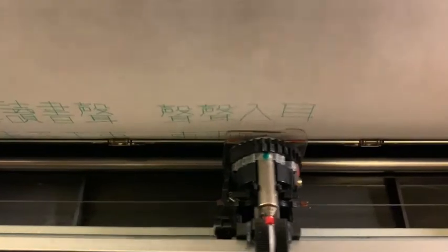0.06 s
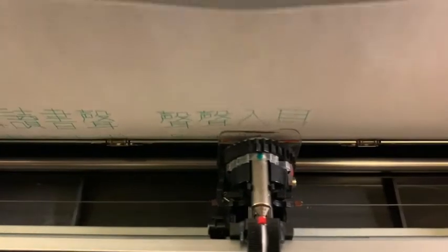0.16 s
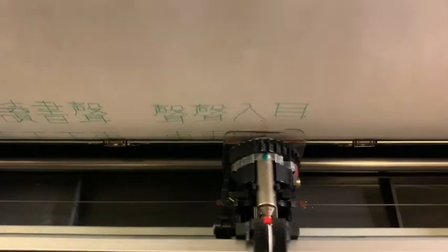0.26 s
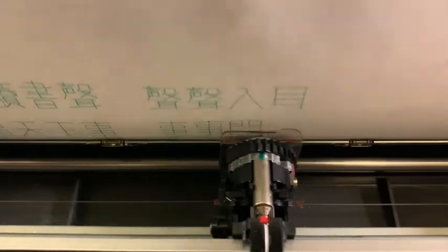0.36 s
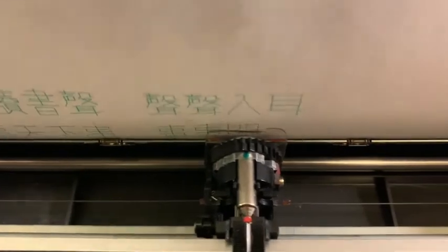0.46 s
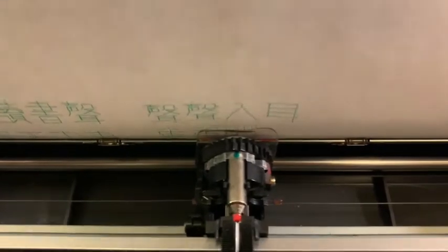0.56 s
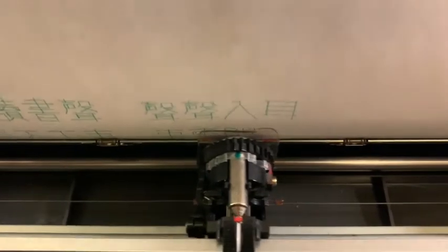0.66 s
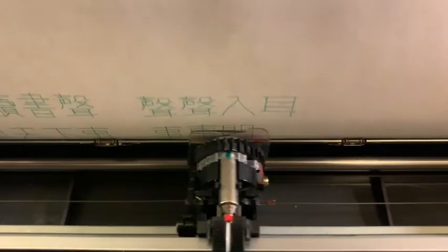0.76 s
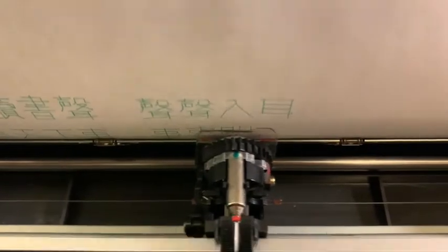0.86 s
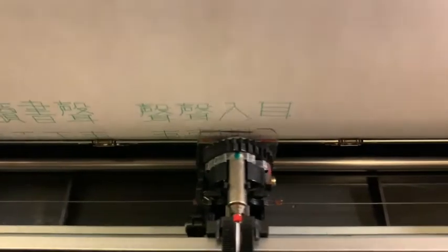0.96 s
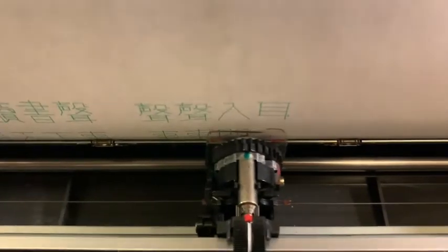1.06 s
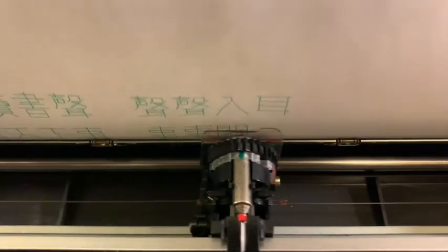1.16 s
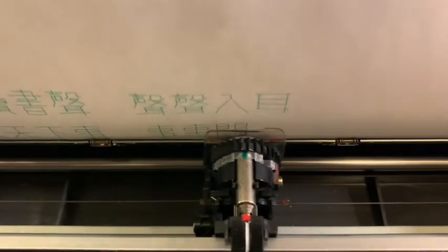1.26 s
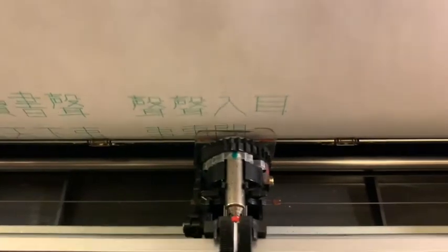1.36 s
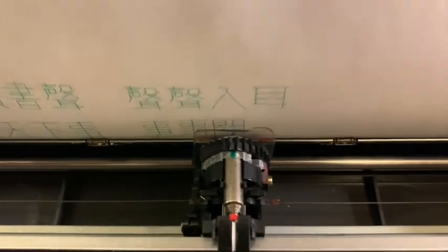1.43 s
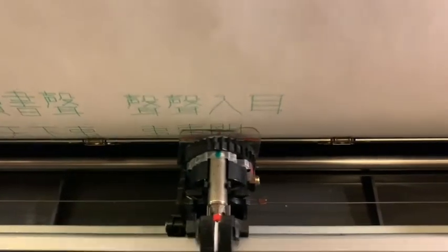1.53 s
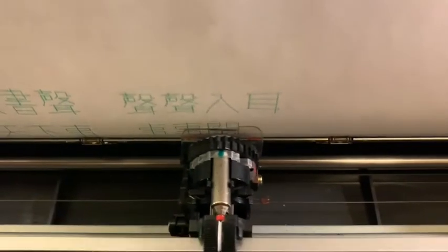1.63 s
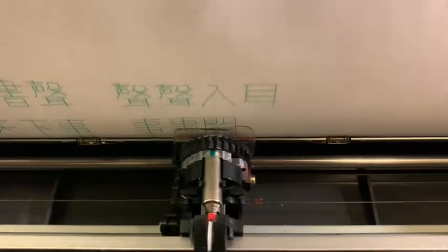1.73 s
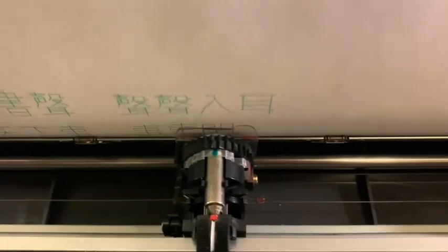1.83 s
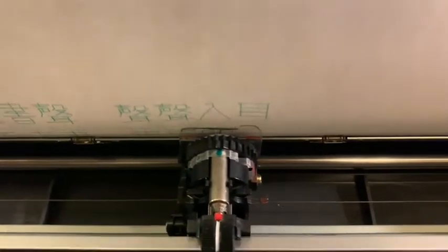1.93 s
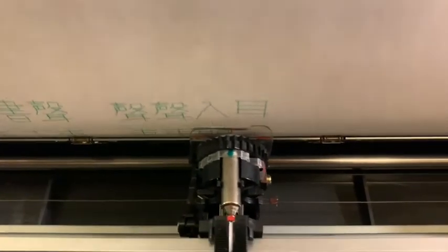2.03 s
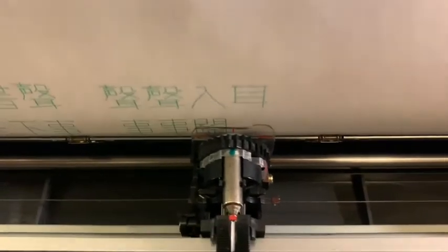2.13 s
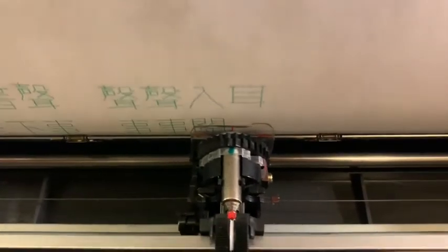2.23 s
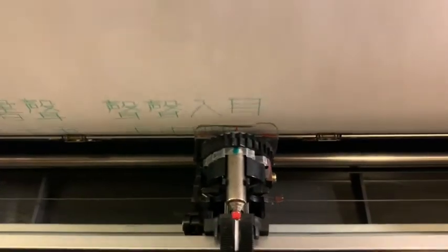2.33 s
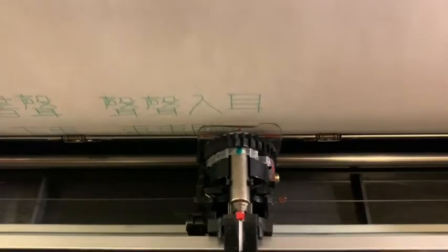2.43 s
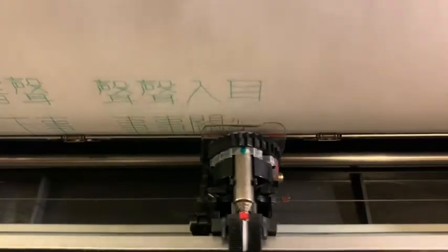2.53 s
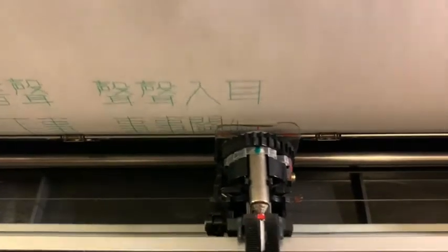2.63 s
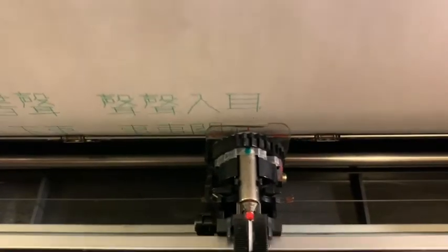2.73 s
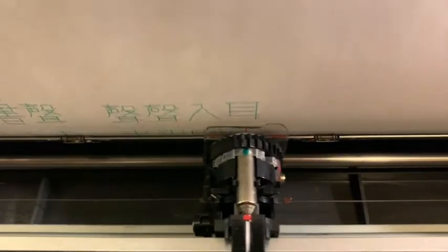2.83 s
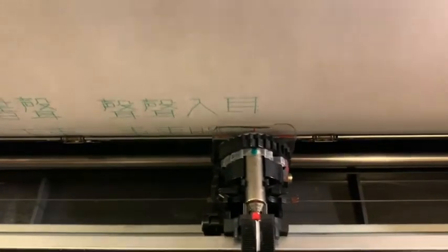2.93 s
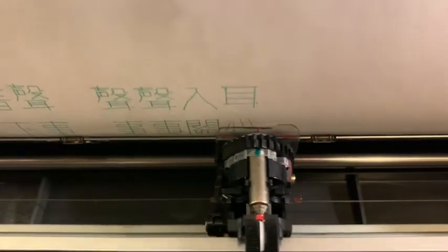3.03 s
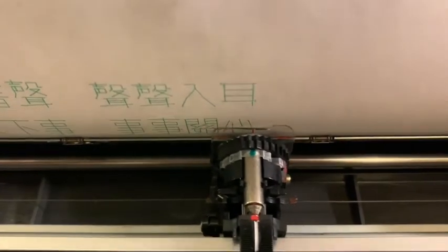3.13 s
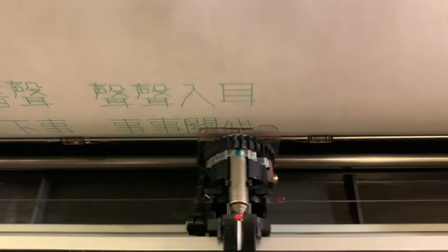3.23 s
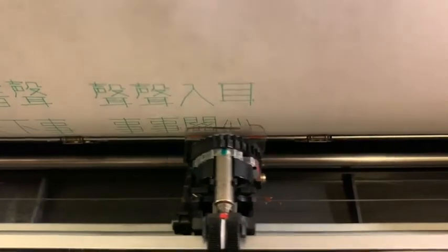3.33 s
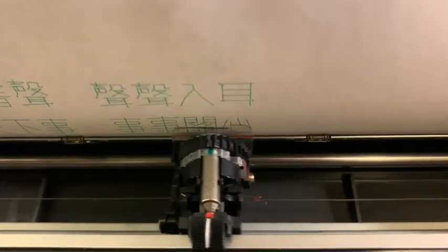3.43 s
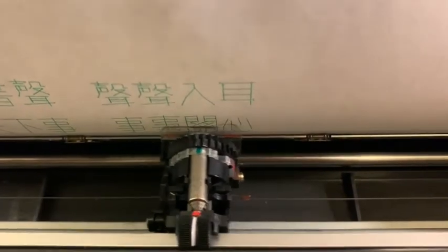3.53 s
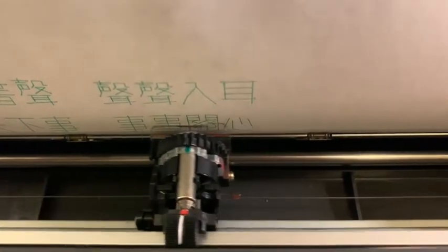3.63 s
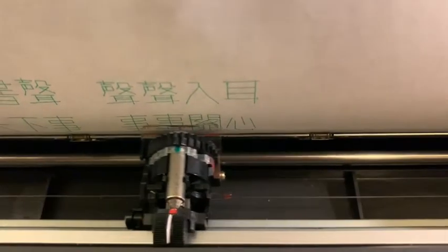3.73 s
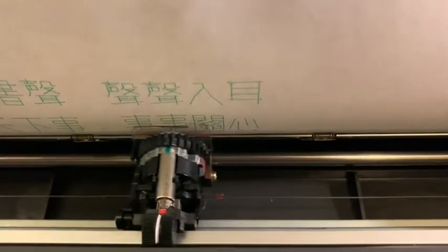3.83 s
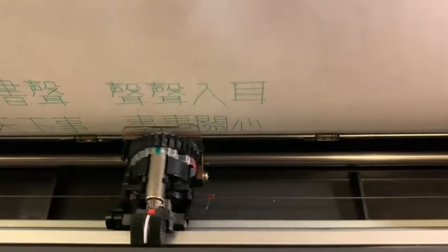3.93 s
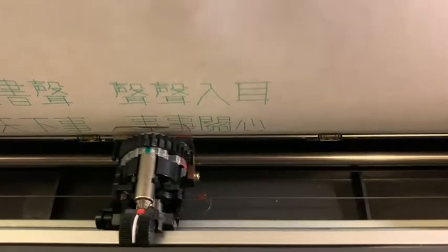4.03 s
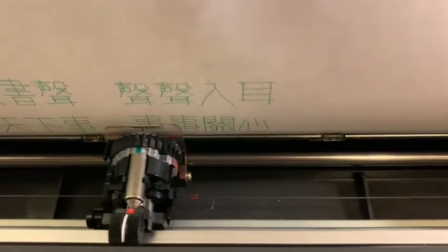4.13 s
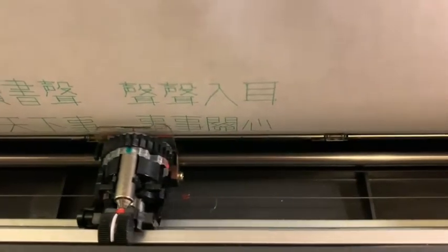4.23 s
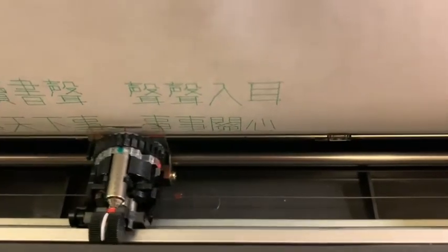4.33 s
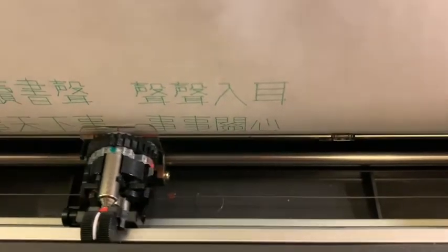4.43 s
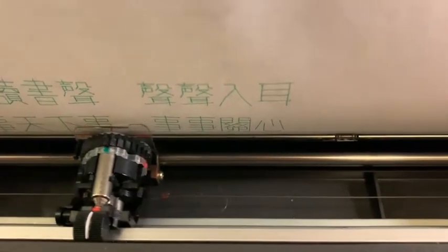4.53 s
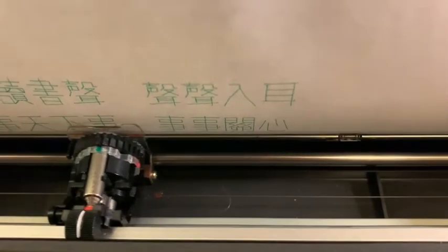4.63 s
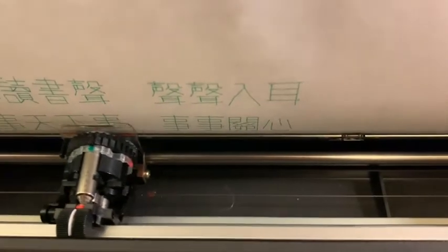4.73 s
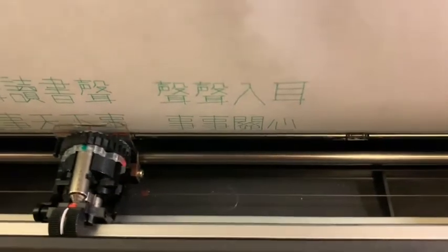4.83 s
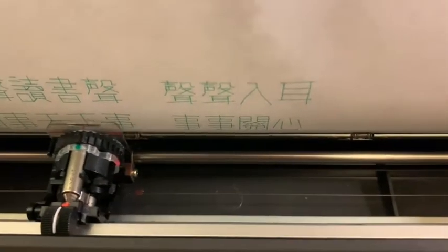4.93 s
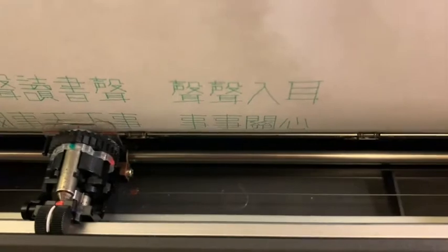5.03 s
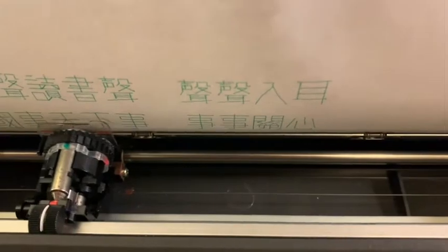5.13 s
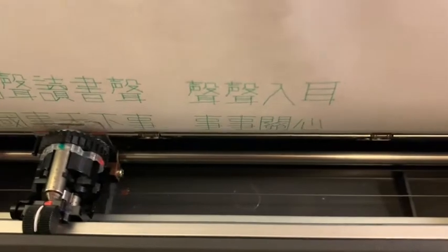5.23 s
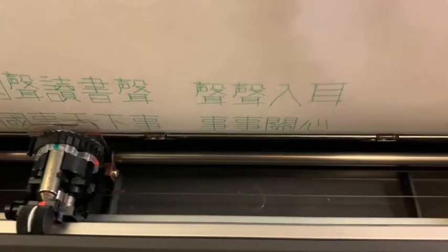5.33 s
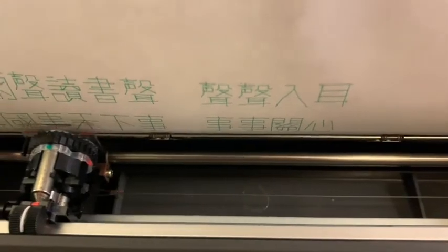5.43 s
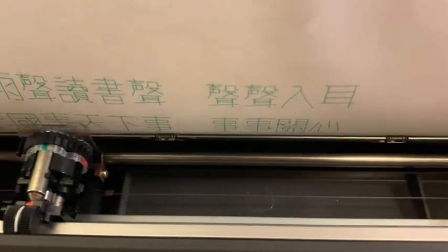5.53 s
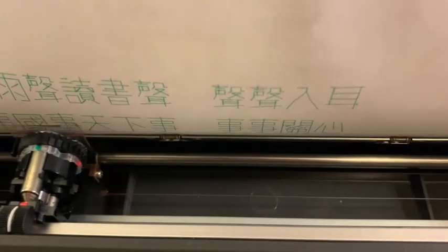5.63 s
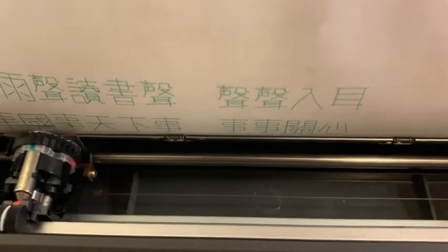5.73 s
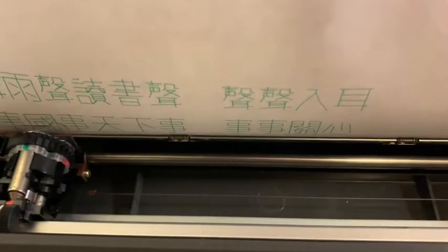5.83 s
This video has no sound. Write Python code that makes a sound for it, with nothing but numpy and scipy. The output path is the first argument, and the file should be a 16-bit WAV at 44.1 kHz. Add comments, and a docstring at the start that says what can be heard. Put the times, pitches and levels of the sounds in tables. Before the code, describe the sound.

A pen plotter is heard from close by in a small, fairly dead room. From 0 to 3.1 s it writes in short jerks: low, wavering motor hums around 120 to 175 Hz last a tenth or two of a second, each at a slightly different pitch, with rattling frame, loose buzzing parts and dull knocks at starts and stops. From about 0.4 s, fourteen very bright, sharp pen snaps with tiny rebounds and a brief metallic ring stand far above the motors, a few per second. Fine nib scratching accompanies strokes. Short higher roller buzzes cluster around 0.6, 1.0, 1.75 and 2.55 s. At 3.1 s the writing stops and a much quieter, steady run begins: nearly sixty crisp ticks per second, almost a purr, with soft sliding, irregular small clacks and a thin wire ring drifting mostly downward. It continues until the end, near 5.9 s, over faint casing rumble.

```python
"""A small room, listened to from close by: a pen-plotter typewriter writes characters.
The pen lever snaps up and down as enveloped noise through resonances, with decaying pure rings on top.
Stepper motors jerk the carriage and paper roller in short strokes: wavering partials and rattling noise.
Then the carriage ticks steadily back to the left margin, each step a set of small noise bursts and rings.
Behind it the casing rumbles and the walls return a short, dull tail."""
import sys
import numpy as np
from scipy import signal
from scipy.fft import rfft, irfft
from scipy.io import wavfile
from scipy.ndimage import uniform_filter1d

SR = 44100
rng = np.random.default_rng(int(sys.argv[2]) if len(sys.argv) > 2 else 0)


def write(x):
    x = np.atleast_2d(x).T
    wavfile.write(sys.argv[1], SR, np.round(np.clip(x, -1, 1) * 32767).astype(np.int16))

N = 258867
TIME = np.arange(N) / SR
FIRST_STEP_S, STEPS_PER_S = 3.1039, 57.935   # the return run

# Pen contacts; clack, clink and spring are relative to the snap and rebounds. Each row: snap time in seconds,
# snap level in dB, first rebound delay in seconds, its dB, second rebound delay in seconds, its dB,
# lead-in noise dB, seat dB, frame clack dB, lever clink dB, spring dB, lever pitch in Hz, spring pitch in Hz,
# pen holder ring dB.
PEN = [(.4262, -10.5, 0.0028, -12.5, 0.0062, -28, -18, -27, -15.5, -14, -19, 13000, 10500, -29),
       (.6614, -8.5, 0.006, -13.5, 0.013, -29, -33, -29, -16.5, -22, -15.5, 12880, 10630, -28),
       (.8741, -11, .002, -11.5, 0.0058, -20, -23, -35, -16, -15, -18.5, 13300, 10800, -29),
       (1.0235, -6, 0.0063, -10.5, .009, -30, -31, -33, -19.5, -21, -16, 12900, 9800, -42),
       (1.2317, -10, 0.0023, -7, 0.0087, -18, -29, -33, -18, -18.5, -17, 13250, 9510, -30),
       (1.353, -8, .0025, -13.5, 0.0057, -13, -23, -38, -15.5, -18.5, -17, 12600, 9400, -33),
       (1.4713, -15, 0.0025, -21, 0.0062, -11.5, -27, -31, -13.5, -16, -14, 13270, 10200, -25),
       (1.6254, -10, .0025, -10, .0057, -11, -28, -38, -17, -17.5, -17, 13250, 9595, -29),
       (1.7653, -12, 0.0041, -15.5, 0.0055, -12.5, -32, -36, -15, -17, -12.5, 13310, 10290, -26),
       (2.0201, -13.5, 0.001485, -15.5, .006, -14, -26, -34, -12, -15, -13, 12400, 10030, -27.5),
       (2.3778, -11, .0024, -10, .005, -20, -30, -40, -16, -13.5, -10, 12600, 9550, -36),
       (2.6452, -9.5, 0.0013, -17, .006, -16.5, -44, -31, -11.5, -18, -11, 13730, 9500, -32),
       (2.84, -16.5, 0.0021, -15, 0.0059, -12.5, -23, -43, -12, -12, -8, 13400, 10620, -27),
       (3.047, -7, 0.0041, -18, 0.0068, -13.5, -35, -45, -19, -17, -11, 13790, 9880, -35)]
# Spectra of contact, clack, clink and spring. Each row: frequency in Hz, relative level in dB.
PEN_COLOUR = [(400, -29), (1500, -17), (3000, -20), (5500, -24), (7000, -18.5), (8700, -9), (10000, -13),
              (11300, -9), (12100, -10.5), (13100, 1), (14000, -1.5), (14800, -3), (15600, -5),
              (16500, -5.5)]
CLACK_COLOUR = [(80, -2), (200, 4), (450, 5), (620, 3.5), (800, 0), (1200, -3), (1900, -16.5), (2700, -4),
                (3700, -13), (4700, -8), (7000, -11), (15000, -11)]
CLINK_COLOUR = [(1000, -10), (2400, 2.5), (3400, -2.5), (4000, -1), (4800, -2), (6000, -1.5), (7800, 5.5),
                (9000, -24), (16000, -55)]
SPRING_COLOUR = [(4000, -36), (7500, -38), (8700, -9.5), (10000, 7), (11200, 0), (12200, -18), (16000, -22)]
# Resonances of the pen lever and the frame. Each row: centre in Hz, width in Hz, lift in dB.
LEVER = [(3382, 69, 13), (4640, 260, 9), (6980, 350, 5.5), (7830, 150, 5), (7960, 220, 4.5), (8650, 190, 6),
         (9900, 220, 5.5), (10320, 130, -7), (10500, 220, 6), (11200, 190, -4), (12670, 350, 7.5),
         (13200, 430, -2), (13800, 260, 2.5), (15100, 360, -8)]
FRAME = [(312, 92, 3.5), (416.6, 22, 7), (484, 54, 10.5), (791, 20, 1.5), (1069, 43, 5), (1440, 106, 10),
         (1605, 350, 10.5), (2124, 31, 6), (2260, 76, 9.5), (2597, 110, 5.5), (3380, 16, 3.5)]
# Stereo width of the writing. Each row: frequency in Hz, side minus mid in dB.
WIDTH_WRITING = [(60, -24), (110, -30), (200, -10), (380, -18.5), (700, -5.5), (1290, -2), (2380, -0.5),
                 (4400, 0.5), (8120, 0), (15000, -25)]
PEN_LEAD_S, PEN_SETTLE_S = 0.0038, 0.0187   # a faint noise swells just before the snap; the lever seats after it
PEN_DECAY_S, CLACK_LAG_S = 0.00069, 0.0031   # each contact dies quickly; the frame answers a little later
LEVER_RING_DB, SPRING_RING_DB = -7, -5   # pure rings, relative to the contact and to the spring's rattle
HOLDER_HZ, HOLDER_LAG_S = 791, 0.00514   # the pen holder rings just after the snap


def pen():
    """A faint noise leads in, the lever snaps, rebounds twice and seats; frame, spring and holder ring."""
    (s, snap_db, first_s, first_db, second_s, second_db, lead_in_db, seat_db,
     clack_db, clink_db, spring_db, lever_hz, spring_hz, holder_db) = np.transpose(PEN)
    hits_s = np.array([s, s + first_s, s + second_s])
    hits_db = np.array([snap_db, first_db, second_db])
    snap = blows(hits_s, hits_db, rise_s=0.00023, decay_s=PEN_DECAY_S)
    lead_in = blows(s - PEN_LEAD_S, lead_in_db, rise_s=0.0012, decay_s=0.0044)
    ringing = blows(hits_s, hits_db - 15, rise_s=0.00064, decay_s=0.002)
    seat = blows(s + PEN_SETTLE_S, seat_db, rise_s=0.0003, decay_s=0.0034)
    contact = np.sqrt(snap ** 2 + lead_in ** 2 + ringing ** 2 + seat ** 2)
    clack = blows(hits_s + CLACK_LAG_S, hits_db + clack_db, rise_s=0.00047, decay_s=0.0097)
    clink = blows(hits_s, hits_db + clink_db, rise_s=0.000063, decay_s=0.0035)
    spring = blows(hits_s, hits_db + spring_db, rise_s=0.00028, decay_s=0.0024)
    return (radiate(contact, PEN_COLOUR, WIDTH_WRITING, LEVER)
            + radiate(clack, CLACK_COLOUR, WIDTH_WRITING, FRAME)
            + radiate(clink, CLINK_COLOUR, WIDTH_WRITING, LEVER)
            + radiate(spring, SPRING_COLOUR, WIDTH_WRITING, LEVER)
            + ring(hits_s, lever_hz, hits_db + LEVER_RING_DB, decay_s=0.0021)
            + ring(hits_s, spring_hz, hits_db + spring_db + SPRING_RING_DB, decay_s=0.0028)
            + ring(s + HOLDER_LAG_S, HOLDER_HZ, holder_db, decay_s=0.015))


# The nib digs into the paper and rasps. Each row: time in seconds, level in dB before its flicker.
BITES = [(.462, -38.5), (.51, -46), (1.485, -41.5), (2.255, -44), (2.665, -37), (2.70, -40.5),
         (2.858, -39.5)]
# Spectrum of nib on paper. Each row: frequency in Hz, relative level in dB.
SCRATCH_COLOUR = [(2000, -16), (5500, 2), (6200, -2), (6700, 13), (7500, 1), (9300, 5.5), (10600, 8),
                  (12000, 1.5), (14000, 0), (16000, 0)]
SCRATCH_SWELL_DB = 2   # spread of the slow swelling as the nib bites and skims


def nib_scratch():
    """Friction noise along each stroke, flickering fast and swelling slowly, with rasps where the nib bites."""
    flicker_db = 3.6 * drift(600) + SCRATCH_SWELL_DB * drift(28.27) - 6.5
    scratch = move_level(STROKES, np.array(STROKES)[:, -1], settle_s=0.0015) * amp(flicker_db)
    rasp = blows(*np.transpose(BITES), rise_s=0.0053, decay_s=0.028) * amp(4.4 * drift(500) - 2.5)
    return radiate(np.hypot(scratch, rasp), SCRATCH_COLOUR, WIDTH_WRITING)


# Pen strokes, levels before flicker and small trims. Each row: start in seconds, end in seconds, pitch in Hz,
# glide over the stroke in Hz, hum dB, whine dB, rattle dB, pulley chatter dB, nib scratch dB.
STROKES = [(0, 0.064, 175.6, 0, -32.5, -36, -34.5, -47, -52),
           (.114, 0.178, 157.1, 8.5, -40.5, -47, -43, -46.5, -42),
           (0.224, 0.39, 145.7, -5.5, -44, -36, -43.5, -49, -46.5),
           (.427, .581, 131.6, 18, -45, -40, -37, -53, -40),
           (0.702, .8, 138.4, -8, -38.5, -34, -40.5, -49, -59),
           (0.847, 0.938, 149.6, -20, -44, -41, -39.5, -48, -44),
           (1.075, 1.166, 126.3, 8, -40, -32.5, -39.5, -51, -50),
           (1.213, 1.314, 146.8, -28.5, -40, -37, -40, -49, -49),
           (1.355, 1.47, 150.1, -14, -40.5, -41, -41, -56, -45),
           (1.47, 1.599, 137.5, 0.5, -40, -45, -38, -49, -48),
           (1.634, 1.725, 153.2, -16.5, -42, -48, -38.5, -62, -45),
           (1.782, 1.961, 132.6, 6, -44, -36, -41, -46.5, -42),
           (2.02, 2.183, 130.4, -15, -44, -36.5, -43.5, -45.5, -42),
           (2.197, 2.23, 116.8, -0.5, -41, -29, -36, -58, -60),
           (2.247, 2.395, 146.2, 13.5, -38.5, -44, -39, -40.5, -43.5),
           (2.4, 2.544, 136, 6, -43, -38.5, -43.5, -53, -46),
           (2.627, 2.836, 141.9, 8, -41.5, -48, -40.5, -46.5, -45),
           (2.84, 2.899, 174.4, 16.5, -31.5, -29, -37.5, -45, -46),
           (2.905, 3.089, 138, -20.5, -45, -37, -41.5, -43.5, -43.5)]
# The roller jerks the paper along. Each row: start in seconds, end in seconds, buzz dB, gear clatter dB.
FEEDS = [(.592, 0.634, -28, -38), (.637, 0.666, -28, -32), (0.673, 0.701, -26, -35),
         (0.945, 1.02, -27.5, -35.5), (1.037, 1.071, -28.5, -39), (1.728, 1.771, -31, -32),
         (2.544, 2.577, -30, -32.5), (3.056, 3.085, -46.5, -31.5)]


def writing():
    """Both motors hum, and every step rattles the gears, the pulley and the frame."""
    turns = motor_turns()
    stroking = move_level(STROKES, np.array(STROKES)[:, 6], settle_s=0.00016)
    feeding = move_level(FEEDS, np.array(FEEDS)[:, 2], settle_s=0.0012)
    # each step shakes the parts hardest at its start, and its strength wanders
    steps = rms_one((np.exp(-(turns % 1) / 0.5) + 1.0) * amp(2.0 * drift(260)))
    drive = carriage_motor(turns) + paper_roller(stroking, feeding) + roller_gears()
    loose = stroking * loose_parts() + drive_ticks(stroking)
    return drive + frame_rattle(stroking, feeding, steps, turns) + loose + pulley_chatter(feeding, steps) + knocks()


SPEED_CHANGE_S = 0.011   # the motor takes up a new speed


def motor_turns():
    """The carriage motor takes up the speed of each stroke and glides on through it, with a slight flutter."""
    start, end, pitch_hz, glide_hz, *_ = np.transpose(STROKES)
    now = np.maximum(np.searchsorted(start, TIME, "right") - 1, 0)
    along = np.clip((TIME - start[now]) / (end - start)[now], 0, 1)
    speed_hz = pitch_hz[now] + glide_hz[now] * (along - 0.5)
    eased = uniform_filter1d(speed_hz, max(int(SPEED_CHANGE_S * SR), 1))
    return np.cumsum(eased * (1 + 0.018 * drift(60))) / SR


# Partials of the carriage motor. Each row: multiple of the stroke pitch, relative level in dB.
MOTOR_ORDERS = [(1, 2), (2, -13), (3, -10), (4, -15), (5, -23.5), (6, -31)]
HUM_ROUGH = 0.22   # spread of the partials' strength, and of their phase in radians
SWAY_LAG_S = 0.0032   # the carriage follows the motor


def carriage_motor(turns):
    """The carriage sways at the motor's lowest partial, and the higher partials whine."""
    hum_db, whine_db = np.array(STROKES)[:, 4:6].T
    sway = hum(turns, MOTOR_ORDERS[:1], HUM_ROUGH, flutter_per_s=81)
    whine = hum(turns, MOTOR_ORDERS[1:], HUM_ROUGH, flutter_per_s=40)
    return move_level(STROKES, hum_db, SWAY_LAG_S) * sway + move_level(STROKES, whine_db, settle_s=0.0041) * whine


# Partials of the roller. Each row: multiple of the roller pitch, relative level in dB.
ROLLER_ORDERS = [(.5, -16), (1, -4), (1.5, -15.5), (2, -14.5), (3, -29)]
ROLLER_HZ, ROLLER_ROUGH = 262.2, 0.12
ROLLER_START_SAG_HZ, ROLLER_SPIN_UP_S = 21.66, 0.013   # each feed starts below full speed
ROLLER_CREEP_DB = -31   # roller hum during strokes, relative to the stroke rattle


def paper_roller(stroking, feeding):
    """The roller motor buzzes in each feed, rising to its speed, and hums faintly along with the strokes."""
    up_to_speed = move_level(FEEDS, np.zeros(len(FEEDS)), ROLLER_SPIN_UP_S)
    speed_hz = ROLLER_HZ * (1 + 0.0121 * drift(40.1)) - ROLLER_START_SAG_HZ * (1 - up_to_speed)
    buzz = hum(np.cumsum(speed_hz) / SR, ROLLER_ORDERS, ROLLER_ROUGH, flutter_per_s=69)
    return (feeding + amp(ROLLER_CREEP_DB) * stroking) * buzz


# Spectrum of the roller gears. Each row: frequency in Hz, relative level in dB.
GEAR_COLOUR = [(150, -16), (330, -11), (440, 5.5), (560, -1), (780, -6), (1200, -14.5), (3000, -48)]
# Resonances of the roller gears. Each row: centre in Hz, width in Hz, lift in dB.
GEARS = [(422.5, 25, 11), (461, 22, 2.5), (510, 68, 9), (640, 21, 6), (761.6, 38, 14.5)]


def roller_gears():
    """The roller gears clatter: noise through their resonances during each feed."""
    clatter = move_level(FEEDS, np.array(FEEDS)[:, 3], settle_s=0.00048)
    return radiate(clatter, GEAR_COLOUR, WIDTH_WRITING, GEARS)


# Spectrum of the rattle. Each row: frequency in Hz, relative level in dB.
RATTLE_COLOUR = [(70, -19.5), (130, 3), (180, 6), (215, 0.5), (300, -1.5), (380, -5.5), (520, -4),
                 (680, -6), (1100, -10), (1500, -17.5), (1850, -19), (2500, -18.5), (3600, -22),
                 (5400, -26), (9000, -21.5), (16000, -26.5)]
FEED_RATTLE_DB = -11   # relative to the feed buzz


def frame_rattle(stroking, feeding, steps, turns):
    """Motor steps shake the frame; part of the noise recurs on every turn, over a faint steady rattle."""
    shaken = (stroking + amp(FEED_RATTLE_DB) * feeding) * steps + amp(-44.5) * (TIME < FIRST_STEP_S)
    return amp(0.5) * radiate(shaken, RATTLE_COLOUR, WIDTH_WRITING, FRAME, turns, repeat=0.19)


# Loose parts that buzz along. Each row: pitch in Hz, level in dB relative to the stroke rattle.
LOOSE_PARTS = [(410, -9.5), (590, -16.5), (790, -18), (1050, -32), (1430, -11.5), (1590, -10.5),
               (2100, -15.5), (2550, -47)]
LOOSE_SWING_DB, LOOSE_WANDER = 6, 0.025   # swing per unit of drift; pitch spread as a share


def loose_parts():
    """Each loose part catches and lets go on its own, and its pitch wanders."""
    out = 0
    for hz, db in LOOSE_PARTS:
        grip = amp(LOOSE_SWING_DB * np.clip(drift(26.14), -2, 1))
        turns = np.cumsum(hz * (1 + LOOSE_WANDER * drift(22))) / SR
        out = out + amp(db) * rms_one(grip * hum(turns, [(1, 0)], rough=0.74, flutter_per_s=170))
    return out


# Spectrum of the pulley. Each row: frequency in Hz, relative level in dB.
PULLEY_COLOUR = [(400, -3), (1250, -4.5), (1500, -10.5), (1850, -4), (2200, -0.5), (2700, -10.5),
                 (3500, -10.5), (8000, -13.5), (16000, -33)]
# Resonances of the pulley. Each row: centre in Hz, width in Hz, lift in dB.
PULLEY = [(1472, 26, 14), (1668, 104, 10), (2050, 90, 9), (2381, 86, 10), (2597, 173, 9.5), (2890, 250, 11)]
FEED_PULLEY_DB = -20   # relative to the feed buzz


def pulley_chatter(feeding, steps):
    """The steps chatter the pulley, tighter or looser from moment to moment."""
    looseness = amp(2.5 * drift(110) + 2 * drift(22))
    pulled = move_level(STROKES, np.array(STROKES)[:, 7], settle_s=0.0044) + amp(FEED_PULLEY_DB) * feeding
    return radiate(pulled * steps * looseness, PULLEY_COLOUR, WIDTH_WRITING, PULLEY)


# Slack in the drive taken up at a start, stop or turn. Each row: time in seconds, level in dB.
KNOCKS = [(0.031, -28), (0.117, -32.5), (0.167, -26.5), (0.223, -25), (0.479, -32), (0.588, -29),
          (0.626, -43), (0.725, -25.5), (0.792, -32), (0.847, -27.5), (0.981, -32), (1.087, -25.5),
          (1.153, -26.5), (1.207, -28.5), (1.407, -32), (2.198, -26.5), (2.237, -33), (2.437, -31.5),
          (2.537, -24.5), (2.625, -24.5)]
# Spectrum of a knock. Each row: frequency in Hz, relative level in dB.
KNOCK_COLOUR = [(100, 14), (400, 15), (800, 4.5), (1500, -4), (2500, 5), (3600, -4.5), (6500, -3),
                (15000, -16)]


def knocks():
    """Slack in the drive is taken up with a knock that rings the frame."""
    return radiate(blows(*np.transpose(KNOCKS), rise_s=0.0011, decay_s=0.0036), KNOCK_COLOUR, WIDTH_WRITING, FRAME)


# Spectrum of small clacks at the pulley. Each row: frequency in Hz, relative level in dB.
CATCH_COLOUR = [(400, -13), (1250, -4), (2200, 5), (3300, -6.5), (4500, -2), (8000, -12.5), (16000, -21)]
GRIT_PER_S, GRIT_DB, GRIT_SPREAD_DB = 45, 5, 12   # the strongest tick, relative to the rattle; range below it


def drive_ticks(stroking):
    """A loose tooth or link ticks at random times during the strokes; a few ticks stand out."""
    chance = rng.random((400, 2))
    s = np.cumsum(-np.log(1 - chance[:, 0])) / GRIT_PER_S
    db = GRIT_DB + GRIT_SPREAD_DB * (chance[:, 1] ** 2 - 1)
    early = s < FIRST_STEP_S
    grit = blows(s[early], db[early], rise_s=0.00022, decay_s=0.0017)
    return radiate(stroking * grit, CATCH_COLOUR, WIDTH_WRITING, PULLEY)


# After a hard stop the carriage rocks on its wire. Each row: time in seconds, pitch in Hz, level in dB.
ROCKS = [(.77, 127.3, -37), (1.135, 127.6, -42), (1.745, 126.9, -33.5), (1.93, 102.1, -39.5),
         (2.555, 137.4, -39), (3.075, 115.9, -39.5)]
ROCK_RISE_S, ROCK_DECAY_S = 0.014, 0.04


def rocking():
    """Each hard stop leaves the carriage swinging around one pitch until it dies away."""
    return sum(blows([s], [db], ROCK_RISE_S, ROCK_DECAY_S) * hum(hz * TIME, [(1, 0)], rough=0.23, flutter_per_s=65)
               for s, hz, db in ROCKS)


# Base levels over the return run. Each row: time in seconds, tick dB, pulley dB, sliding dB, sharp crack dB.
RETURN = [(3.12, -42.5, -44, -47.5, -52), (3.35, -42.5, -43.5, -49.5, -49), (3.7, -45, -42, -48.5, -46),
          (4.1, -45, -43.5, -49.5, -47), (4.5, -44, -45, -47.5, -44), (5.0, -45.5, -42.5, -50, -45),
          (5.4, -44.5, -42, -51.5, -43), (5.67, -47.5, -40.5, -52.5, -40), (5.87, -49.5, -40, -49, -45)]
# The four coil phases of a motor cycle, relative to the base levels. Each row: lag in seconds, tick dB,
# crack dB, ping dB, rebound dB, pulley dB, wire dB.
PHASES = [(0.00079, -1.5, 1.5, 1.5, -2, 1, -2), (0.0029, -1.5, -3, -6, -25.5, -4, -1),
          (.0002, 2.5, 0, 5, -2.5, -10, -3), (0.0005, -2, -8, -9, -3.5, -1.5, 1)]
# The pulley catches and lets go with a small clack. Each row: time in seconds, level in dB.
CATCHES = [(3.307, -46), (3.365, -40), (3.433, -41.5), (3.641, -36.5), (3.779, -40), (3.916, -43),
           (3.986, -38.5), (4.123, -39), (4.138, -41), (4.276, -41), (4.468, -39.5), (4.606, -41.5),
           (4.722, -40), (4.951, -43), (5.021, -40.5), (5.159, -37), (5.297, -41), (5.367, -36),
           (5.436, -37), (5.518, -43), (5.553, -39.5), (5.588, -48), (5.655, -37)]
# Spectra of tick, crack and slide. Each row: frequency in Hz, relative level in dB.
TICK_COLOUR = [(1000, -12.5), (3000, -27), (5600, -11), (7400, -7.5), (8500, -3), (9700, -3), (10700, -7.5),
               (11400, -6), (11900, -11), (13100, -3), (14000, -6), (16000, -12)]
CRACK_COLOUR = [(3000, -26), (8000, -20), (9700, -16), (12000, -10), (13000, 1), (13700, 20), (14700, 14),
                (16000, 4)]
SLIDE_COLOUR = [(40, -50), (110, -11), (180, -6), (290, -2), (370, -7.5), (455, 5.5), (500, 5.5), (580, -4),
                (900, 3.5), (1230, -6.5), (1480, 3.5), (2400, -19), (3600, -16), (5500, -26), (8700, -17.5),
                (16000, -44)]
# The ping of the steps, drifting slightly. Each row: time in seconds, pitch in Hz, level in dB.
PING = [(3.1, 6700, -51.5), (3.401, 6810, -48), (4.3, 6710, -51.5), (5.0, 6680, -50), (5.87, 6540, -55)]
# Motor hum of the return. Each row: multiple of the step rate, level in dB at mid-run.
RETURN_ORDERS = [(2, -67.5), (5, -64), (8, -61.5), (8.5, -61)]
# Stereo width of the return. Each row: frequency in Hz, side minus mid in dB.
WIDTH_RETURN = [(60, 5), (110, -26), (200, 2), (380, -9), (700, -9), (1290, 0), (2380, -1.5), (4400, 2.5),
                (8120, 0.5), (15000, -22)]
STEP_SPREAD_DB, STEP_JITTER_S = 1.1, 0.0002
STEP_REBOUND_S = 0.0084   # the rotor overshoots and ticks again
PULLEY_ROCK_S, PULLEY_RUB_DB = 0.0042, -10.5   # rocks early on the first phase, half as much late on the last
RETURN_HUM_SWELL_DB = 5.5   # the hum grows over the run


def carriage_return():
    """Slow single steps: each ticks, rebounds, rocks the pulley and plucks the wire while the carriage slides."""
    tick_db, pulley_db, slide_db, crack_db = in_time(RETURN)
    count = np.arange(int((N / SR - FIRST_STEP_S) * STEPS_PER_S) + 1)
    phase = count % len(PHASES)
    (lag_s, step_tick_db, step_crack_db, ping_db, rebound_db,
     step_pulley_db, wire_db) = np.array(PHASES)[phase].T
    chance = rng.standard_normal((len(count), 5))
    s = FIRST_STEP_S + count / STEPS_PER_S + lag_s + STEP_JITTER_S * chance[:, 0]
    strike_luck_db, rebound_luck_db, rock_luck_db = STEP_SPREAD_DB * chance[:, 2:].T
    moving, steps = TIME > FIRST_STEP_S, TIME * STEPS_PER_S
    cycles = steps / len(PHASES)

    strike = blows(s, step_tick_db + strike_luck_db, rise_s=0.0001, decay_s=0.0035)
    rebound_s = s + STEP_REBOUND_S + 0.0019 * chance[:, 1]
    rebound = blows(rebound_s, rebound_db + 2 * rebound_luck_db, rise_s=0.00075, decay_s=0.0092)
    crack = blows(s, step_crack_db + strike_luck_db, rise_s=0.00018, decay_s=0.0014)
    ping = blows(s, ping_db + strike_luck_db, rise_s=0.0001, decay_s=0.0019)
    ping = np.hypot(ping, amp(-5.0) * rebound)
    rock_lag_s = np.interp(phase, [0, len(PHASES) - 1], [-PULLEY_ROCK_S, PULLEY_ROCK_S / 2])
    rock = blows(s + rock_lag_s, step_pulley_db + rock_luck_db, rise_s=0.00067, decay_s=0.0041)
    rub = moving * amp(PULLEY_RUB_DB + 2 * drift(45))
    catch = blows(*np.transpose(CATCHES), rise_s=0.00021, decay_s=0.006)
    pluck = blows(s, wire_db, rise_s=0.00064, decay_s=0.014)
    slide = (0.47 * moving + 0.83 * pluck) * amp(slide_db)
    travelled = (TIME - FIRST_STEP_S) / (TIME[-1] - FIRST_STEP_S)
    swell = moving * amp(RETURN_HUM_SWELL_DB * (travelled - 0.5))
    return (radiate(np.hypot(strike, rebound) * amp(tick_db), TICK_COLOUR, WIDTH_RETURN)
            + radiate(crack * amp(crack_db), CRACK_COLOUR, WIDTH_RETURN, (), cycles, repeat=0.4)
            + gliding_ring(ping, PING, width_hz=560, side_db=-1.5, pan_db=-1.0, turns=cycles, repeat=0.33)
            + radiate(np.hypot(rock, rub) * amp(pulley_db), PULLEY_COLOUR, WIDTH_RETURN, PULLEY, cycles, repeat=0.3)
            + radiate(catch, CATCH_COLOUR, WIDTH_RETURN, PULLEY)
            + radiate(slide, SLIDE_COLOUR, WIDTH_RETURN, (), cycles, repeat=0.33)
            + drive_wire(pluck, cycles)
            + swell * hum(steps, RETURN_ORDERS, rough=0.48, flutter_per_s=4.3))


# The drive wire, mostly falling in pitch as its free span grows. Each row: time in seconds, pitch in Hz,
# level in dB before the frame colours it.
WIRE = [(3.1, 1007, -57), (3.601, 967, -47.5), (4.099, 926, -43), (4.499, 876, -44), (5.0, 827, -43),
        (5.5, 830, -44), (5.87, 810, -47)]
# Frame resonances the wire sweeps through. Each row: centre in Hz, width in Hz, lift in dB.
BRACKET = [(679, 49, 10), (814, 26, 4.5), (947, 35, 9), (1058, 43, 16)]
WIRE_REPEAT = 0.51   # share of the ring's energy that is alike on every motor cycle


def drive_wire(pluck, cycles):
    """The plucked wire rings at a gliding pitch and swells where it meets a frame resonance."""
    wire = gliding_ring(pluck, WIRE, width_hz=210, side_db=-5.0, pan_db=-1.5, turns=cycles, repeat=WIRE_REPEAT)
    return np.array([coloured(ear, [(300, -2.0), (2000, -12.5)], BRACKET, keep_power=False) for ear in wire])


# Spectrum of the casing. Each row: frequency in Hz, relative level in dB.
SHAKE_COLOUR = [(20, -35), (35, -17), (50, -0.5), (75, -8.5), (100, 1.5), (150, -19), (300, -33.5)]
CASING_DB, CASING_MOVE_DB, CASING_RING_S = -56, -48.5, 0.066   # steady rumble; added by each move


def casing():
    """The casing rumbles softly, more during strokes and feeds, and booms after each knock."""
    moves = STROKES + FEEDS
    moving = move_level(moves, [CASING_MOVE_DB] * len(moves), CASING_RING_S)
    s, db = np.transpose(KNOCKS)
    boom = blows(s, db - 19.5, rise_s=0.004, decay_s=0.061)
    return radiate(np.hypot(np.hypot(moving, boom), amp(CASING_DB)), SHAKE_COLOUR, WIDTH_WRITING)


ROOM_T60_S, ROOM_DB = 0.13, -13.5   # tail level before its treble is dulled


def room(x):
    """A short, dull tail from the walls, different at each ear."""
    age = TIME[:SR // 4]
    tail = rng.standard_normal((2, len(age))) * amp(-60 * age / ROOM_T60_S) * (age > 0.005)
    dull = signal.sosfilt(signal.butter(1, 4000, fs=SR, output="sos"), tail) / np.linalg.norm(tail[0])
    return signal.oaconvolve(x, dull, axes=1)[:, :N]


def amp(db):
    """Decibels to gain."""
    return 10 ** (np.asarray(db) / 20)


def rms_one(x):
    """Scale to unit rms."""
    return x / np.sqrt(np.mean(x ** 2) + 1e-20)


def in_time(rows):
    """Each column of a curve at every sample."""
    s, *columns = np.transpose(rows)
    return [np.interp(TIME, s, c) for c in columns]


def drift(per_s):
    """Random wandering with unit rms."""
    return rms_one(np.interp(TIME * per_s, np.arange(4096), rng.standard_normal(4096)))


def coloured(x, spectrum, resonances=(), keep_power=True, size=4096):
    """Causal minimum-phase filter that follows a spectrum with resonant peaks on top."""
    hz = np.fft.rfftfreq(size, 1 / SR) + 1
    points = np.array(spectrum)
    db = np.interp(np.log(hz), np.log(points[:, 0]), points[:, 1])
    for centre, width, height in resonances:
        db = db + height / (1 + (2 * (hz - centre) / width) ** 2)
    cepstrum = irfft(np.log(amp(db)))[:size // 2]
    cepstrum[1:] *= 2
    response = irfft(np.exp(rfft(cepstrum, size)))
    if keep_power:
        response = response / np.linalg.norm(response)
    return signal.oaconvolve(x.astype(np.float32), response.astype(np.float32))[:N]


def contacts(turns=None, repeat=0.):
    """Two streams of dense tiny contacts; a share of their energy recurs alike on every motor turn."""
    fresh = rng.standard_normal((2, N))
    if turns is None:
        return fresh
    sample, share = np.arange(N), np.clip(repeat, 0, 1)
    new_turn = np.diff(np.floor(turns), prepend=0) > 0
    since_turn = sample - np.maximum.accumulate(sample * new_turn)
    return np.sqrt(1 - share) * fresh + np.sqrt(share) * fresh[:, -1 - since_turn]


def radiate(envelope, spectrum, width, resonances=(), turns=None, repeat=0.):
    """Contacts under an envelope ring a part, heard in stereo."""
    mid, side = (coloured(envelope * c, spectrum, resonances) for c in contacts(turns, repeat))
    return mid + coloured(side, width, keep_power=False) * [[1], [-1]]


def blows(times, levels_db, rise_s, decay_s):
    """Envelope of blows whose energies swell, die away and add up."""
    energy = np.zeros(N)
    samples = np.clip((np.asarray(times) * SR).astype(int), 0, N - 1)
    np.add.at(energy, samples, amp(levels_db) ** 2)
    age = TIME[:SR // 4]
    shape = (1 - np.exp(-age / rise_s)) * np.exp(-age / decay_s)
    return np.sqrt(np.maximum(signal.oaconvolve(energy, (shape / shape.max()) ** 2)[:N], 0))


def move_level(moves, levels_db, settle_s):
    """Each move switches the drive on from its start to its end; the parts take a moment to follow."""
    drive = sum(amp(db) * ((TIME >= row[0]) & (TIME < row[1])) for row, db in zip(moves, levels_db))
    keep = np.exp(-1 / (settle_s * SR))
    return signal.lfilter([1 - keep], [1, -keep], drive + 1e-9)


def hum(turns, orders, rough, flutter_per_s):
    """Motor partials (to the nearest half order), each wavering in strength and phase."""
    out = 0
    for multiple, db in orders:
        cycles = round(2 * multiple) / 2 * turns + rng.random()
        phase = 2 * np.pi * cycles + rough * drift(flutter_per_s)
        out = out + amp(db) * (1 + rough * drift(flutter_per_s)) * np.sin(phase.astype(np.float32))
    return out * np.sqrt(2 / (1 + rough ** 2))


def ring(times, hz, levels_db, decay_s):
    """Each blow starts a decaying pure ring at its own pitch, its strength varied at random."""
    out, age = np.zeros(N + SR), TIME[:SR // 8]
    fade = np.exp(-age / decay_s) * (1 - np.exp(-10 * age / decay_s))
    for s, pitch_hz, db in np.broadcast(times, hz, levels_db):
        start = int(s * SR)
        gain = amp(db + 2 * rng.standard_normal())
        out[start:start + len(age)] += gain * fade * np.sin(2 * np.pi * (pitch_hz * age + rng.random()))
    return out[:N]


def gliding_ring(envelope, glide, width_hz, side_db, pan_db, turns=None, repeat=0.):
    """The steps keep a resonance ringing while its pitch moves."""
    hz, db = in_time(glide)
    keep = np.exp(-np.pi * width_hz / SR)
    spin = np.exp(2j * np.pi * np.cumsum(hz) / SR)
    kicks = envelope * contacts(turns, repeat) + 1e-18
    # shift down to zero, smooth twice, shift back up
    ringing = (signal.lfilter([1], [1, -2 * keep, keep ** 2], kicks / spin) * spin).real
    mid, side = ringing / ringing[:, TIME > FIRST_STEP_S].std(axis=1, keepdims=True) * amp(db)
    return (mid + amp(side_db) * side * [[1], [-1]]) * amp([[pan_db / 2], [-pan_db / 2]])


def scene():
    """The whole machine and its room."""
    machine = pen() + nib_scratch() + writing() + rocking() + carriage_return() + casing()
    return machine + amp(ROOM_DB) * room(machine)


CUTOFF_HZ = 15900


def record(dry):
    """The microphone drops the deep bass and rounds the loudest snaps; the top is cut steeply."""
    thinned = signal.sosfilt(signal.butter(4, 36, "high", fs=SR, output="sos"), dry)
    rounded = 0.6 * np.tanh(thinned / 0.6)
    return signal.sosfilt(signal.ellip(12, 0.2, 80, CUTOFF_HZ, fs=SR, output="sos"), rounded)


dry = scene()
out = record(dry)
write(out)
```